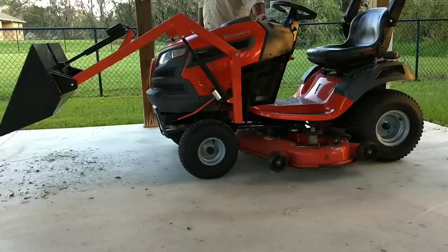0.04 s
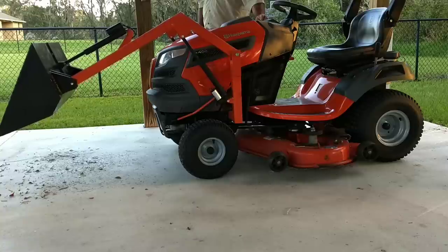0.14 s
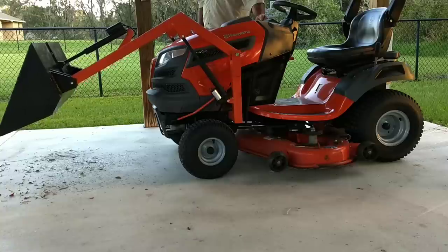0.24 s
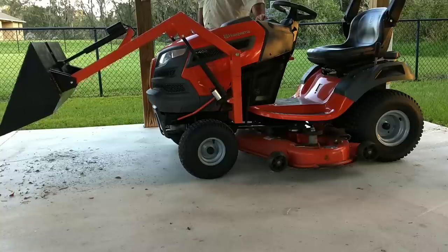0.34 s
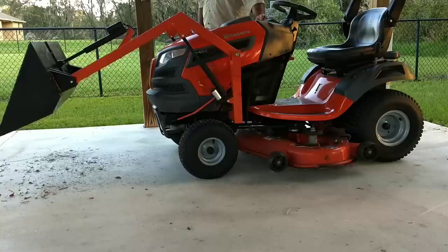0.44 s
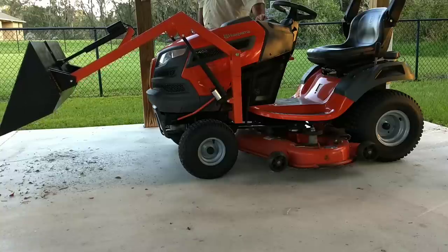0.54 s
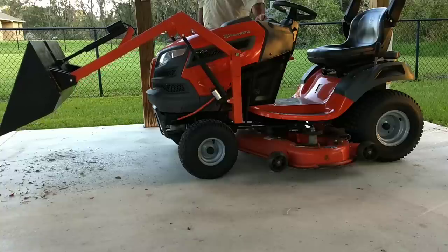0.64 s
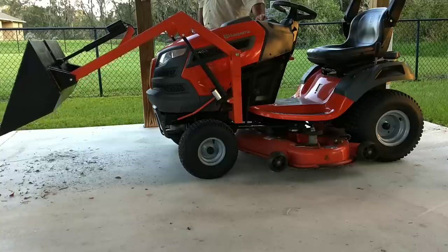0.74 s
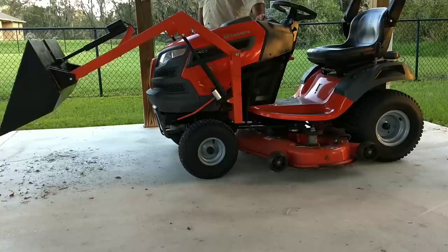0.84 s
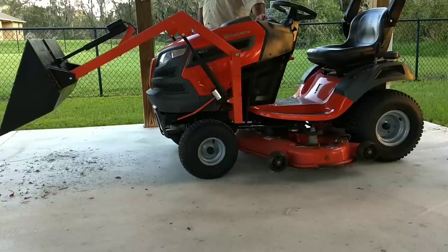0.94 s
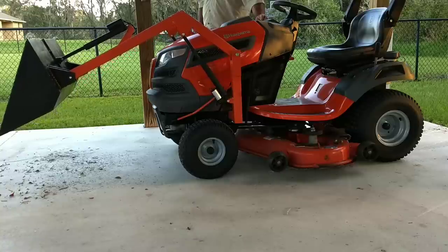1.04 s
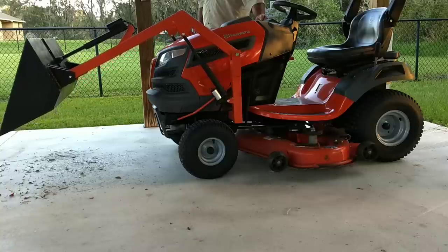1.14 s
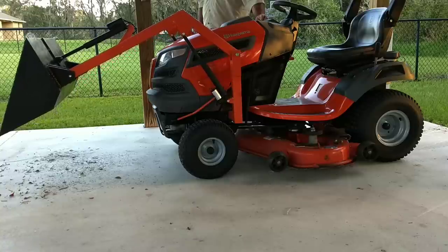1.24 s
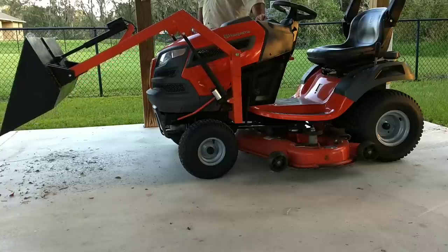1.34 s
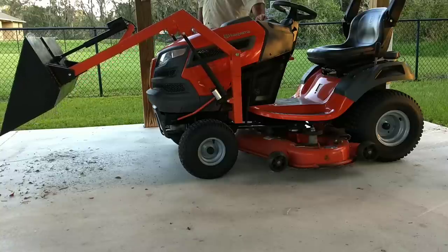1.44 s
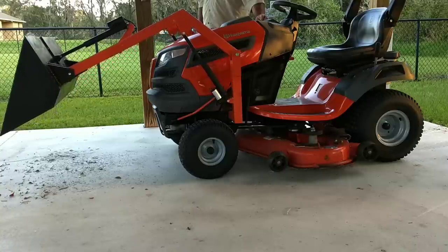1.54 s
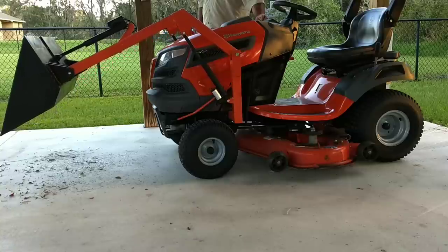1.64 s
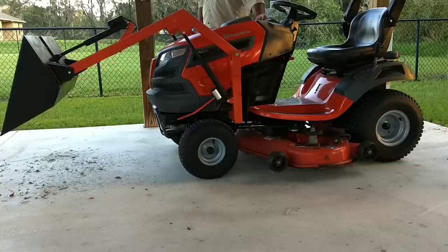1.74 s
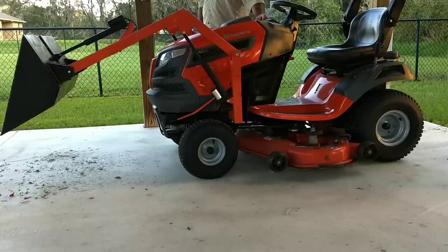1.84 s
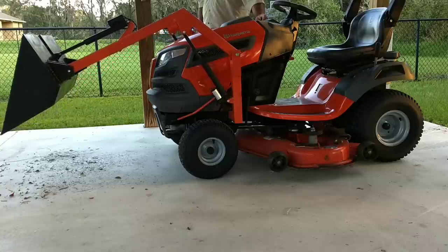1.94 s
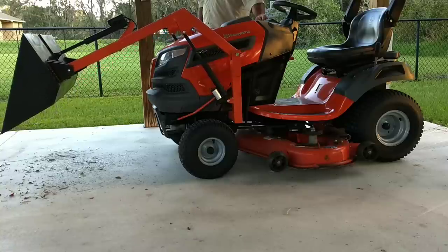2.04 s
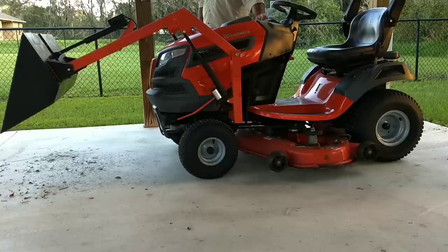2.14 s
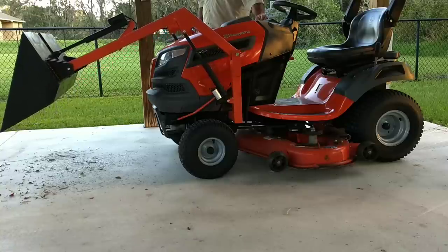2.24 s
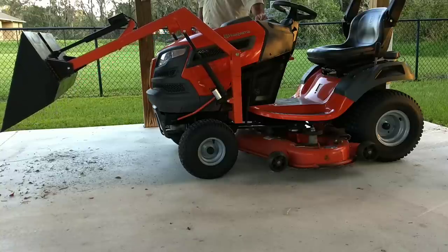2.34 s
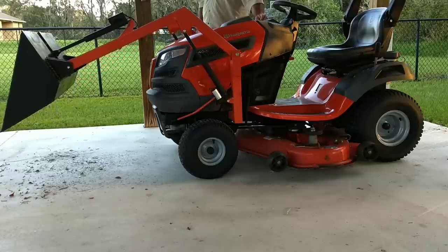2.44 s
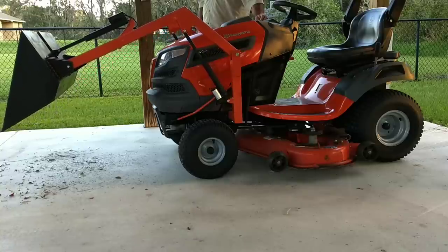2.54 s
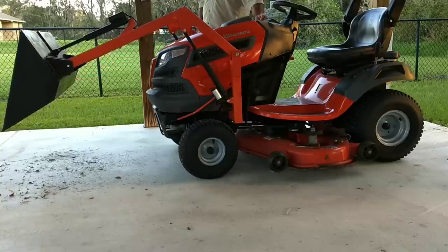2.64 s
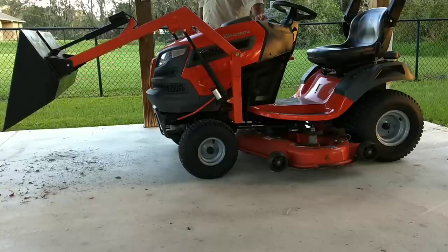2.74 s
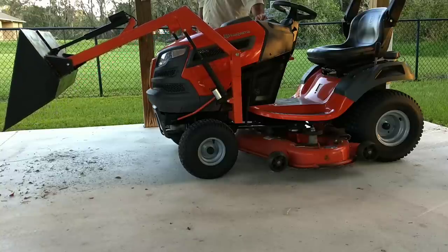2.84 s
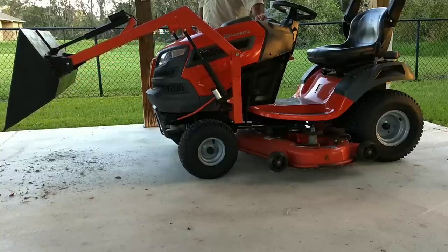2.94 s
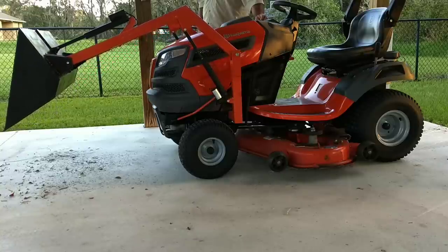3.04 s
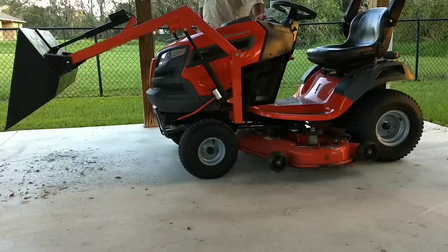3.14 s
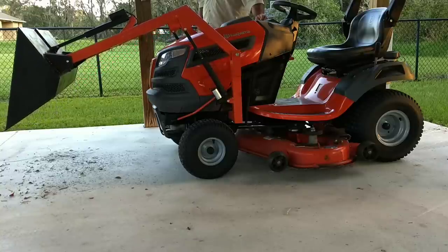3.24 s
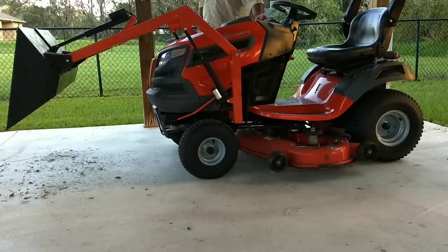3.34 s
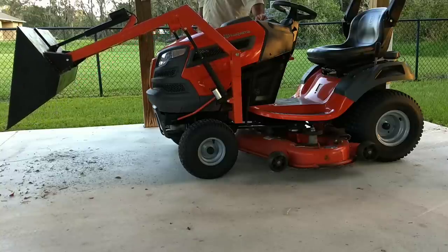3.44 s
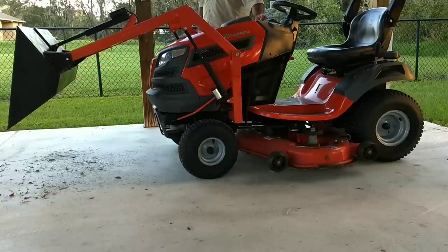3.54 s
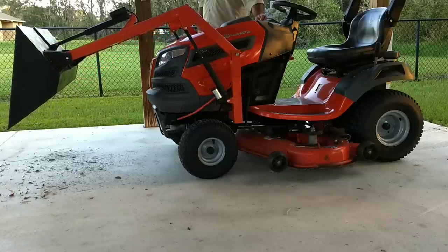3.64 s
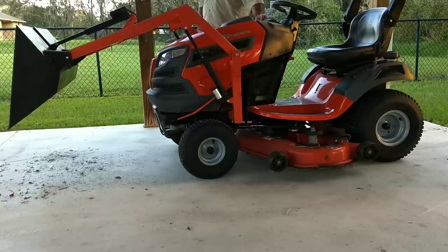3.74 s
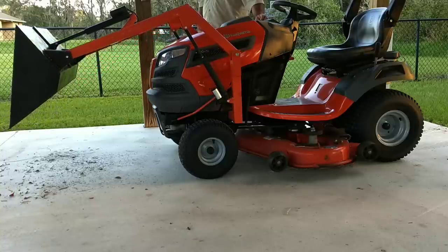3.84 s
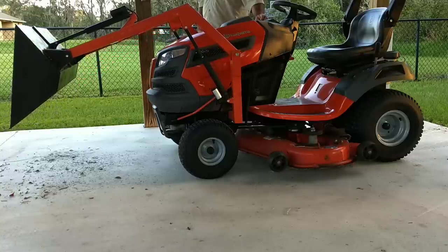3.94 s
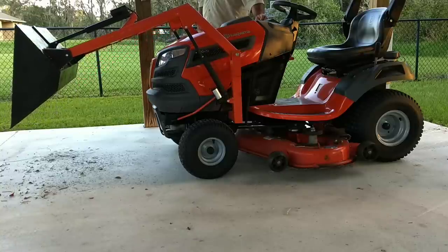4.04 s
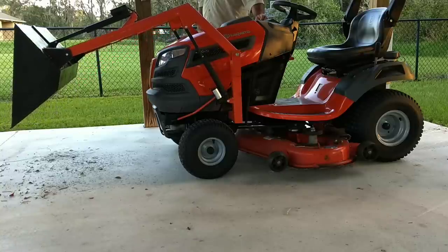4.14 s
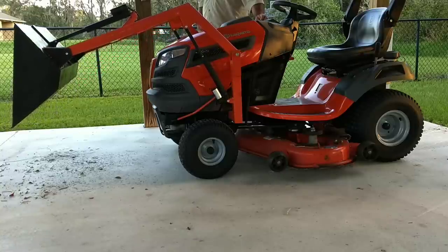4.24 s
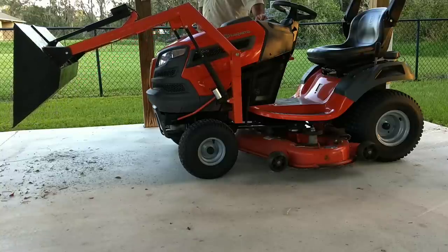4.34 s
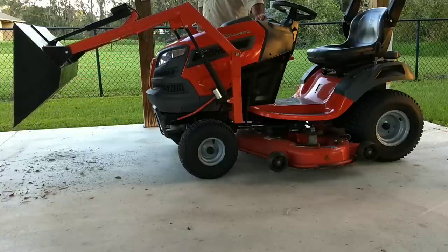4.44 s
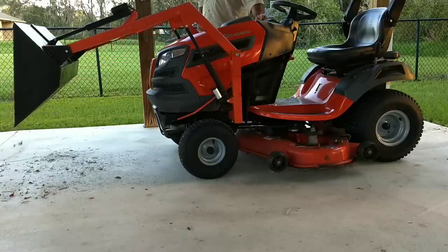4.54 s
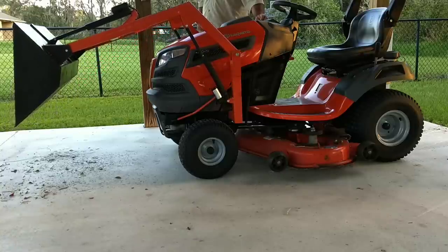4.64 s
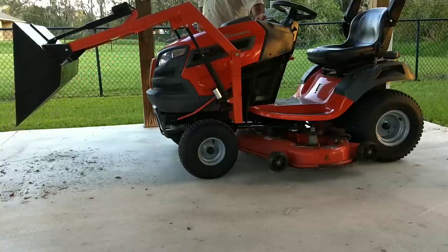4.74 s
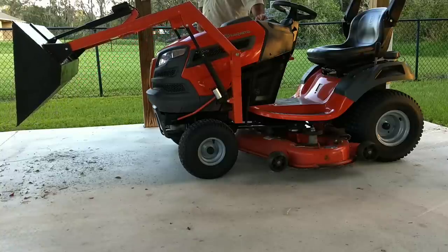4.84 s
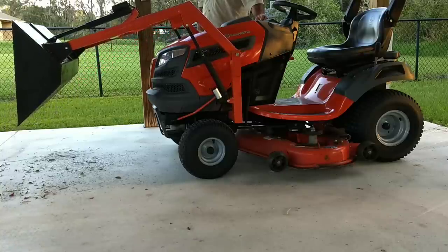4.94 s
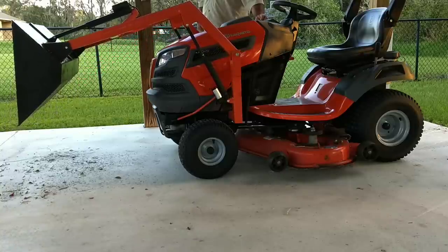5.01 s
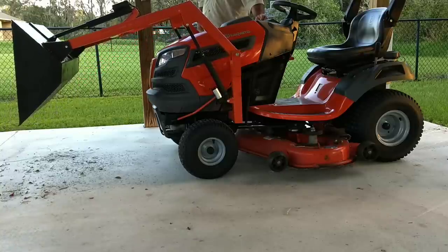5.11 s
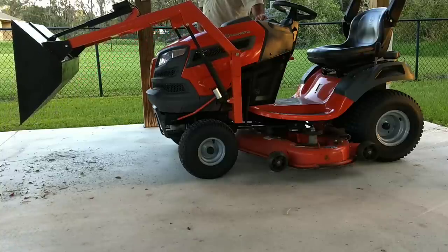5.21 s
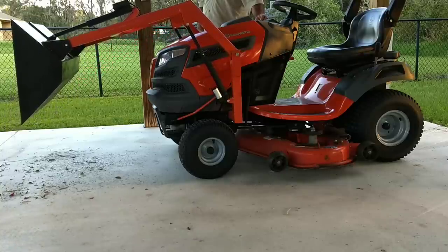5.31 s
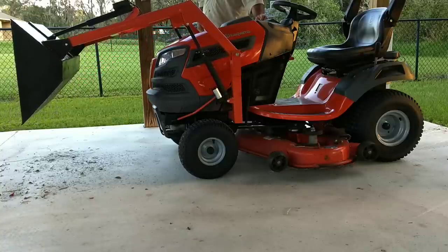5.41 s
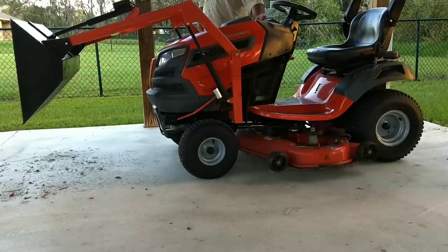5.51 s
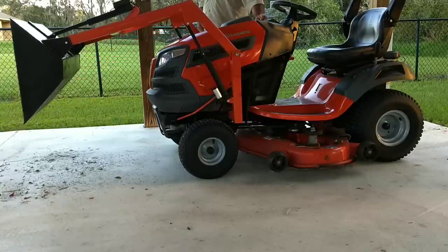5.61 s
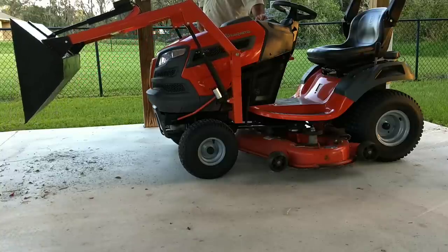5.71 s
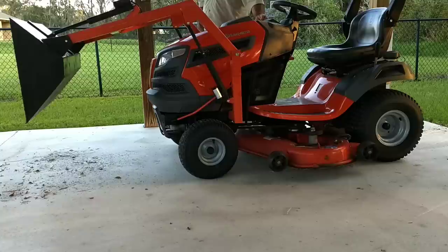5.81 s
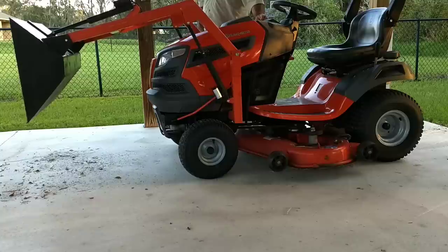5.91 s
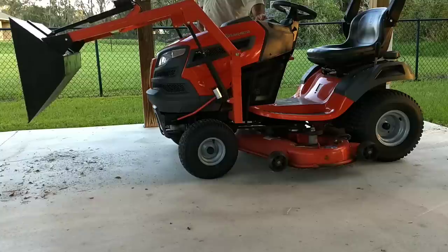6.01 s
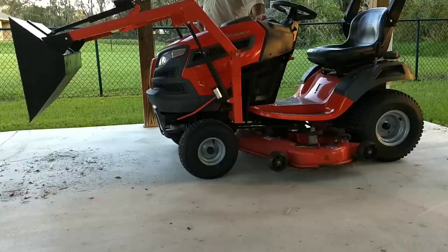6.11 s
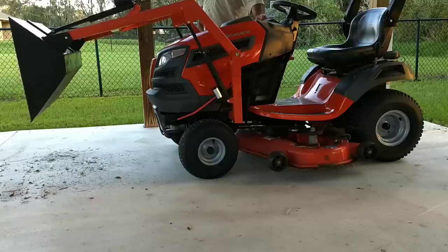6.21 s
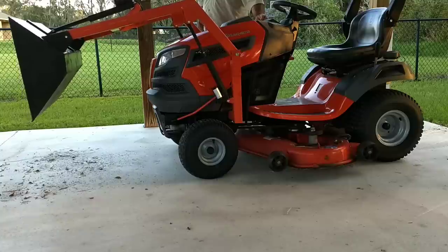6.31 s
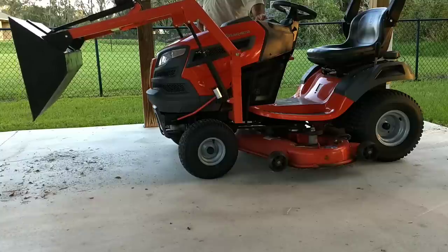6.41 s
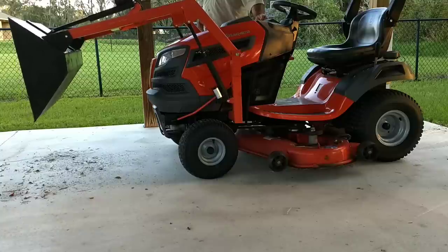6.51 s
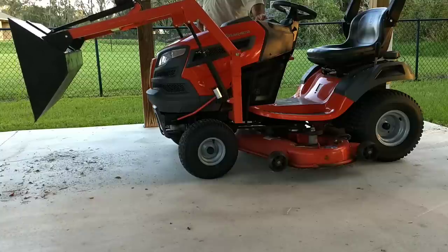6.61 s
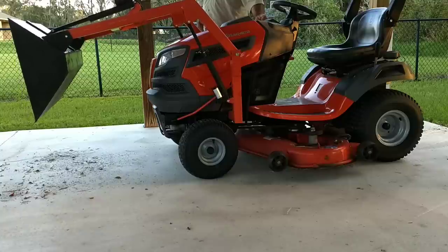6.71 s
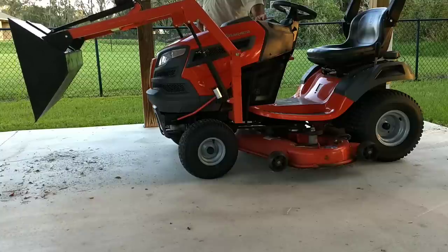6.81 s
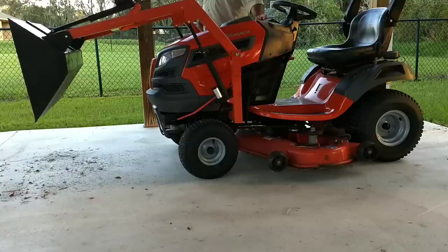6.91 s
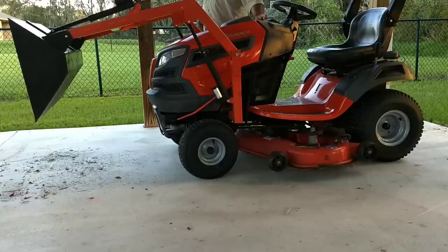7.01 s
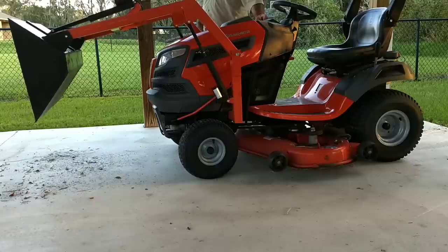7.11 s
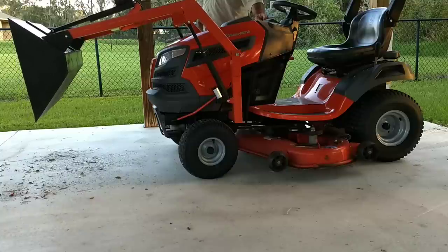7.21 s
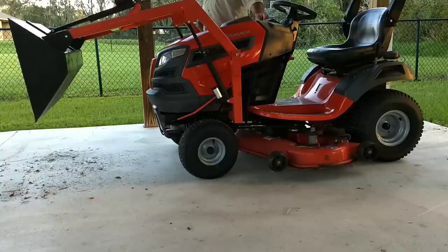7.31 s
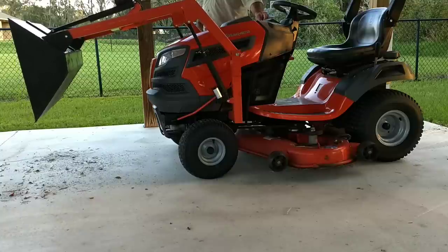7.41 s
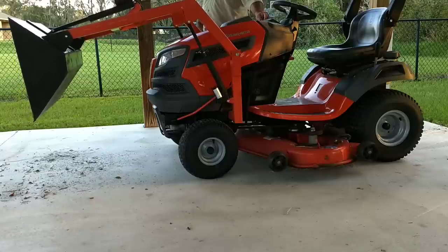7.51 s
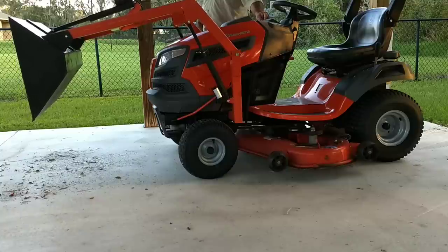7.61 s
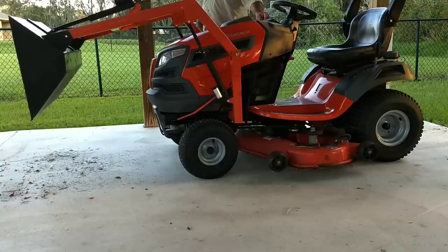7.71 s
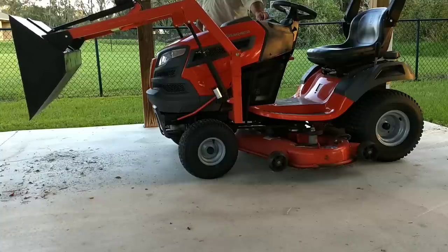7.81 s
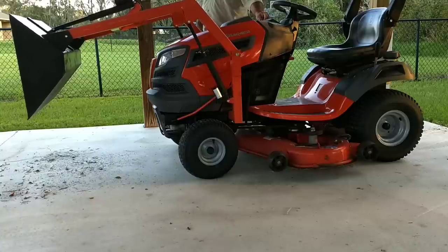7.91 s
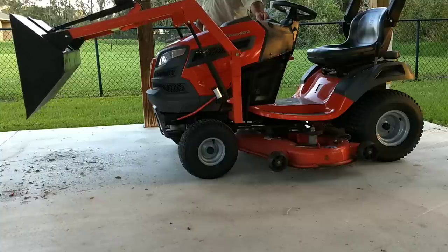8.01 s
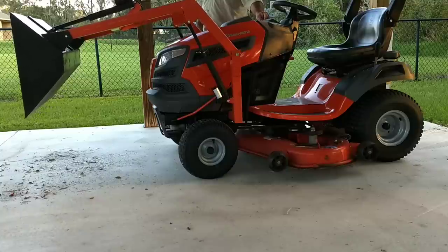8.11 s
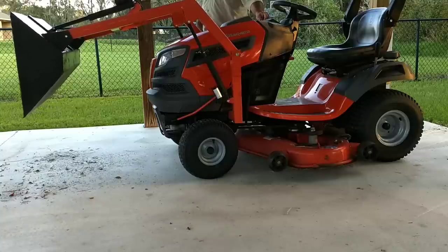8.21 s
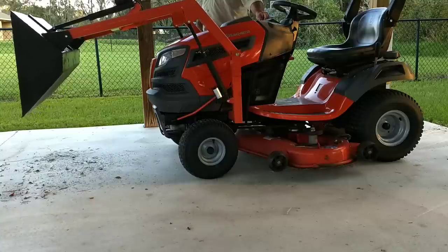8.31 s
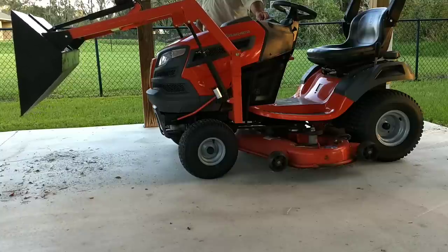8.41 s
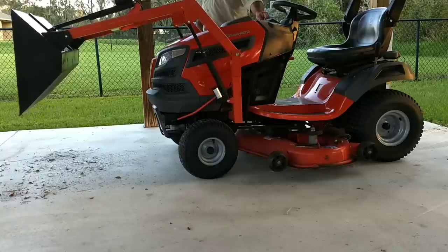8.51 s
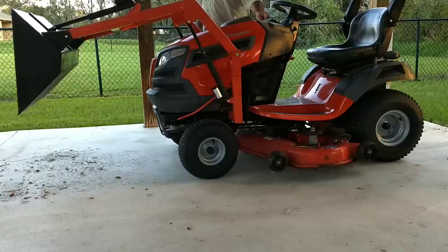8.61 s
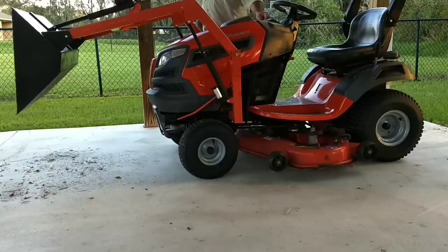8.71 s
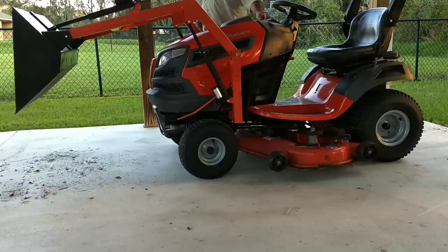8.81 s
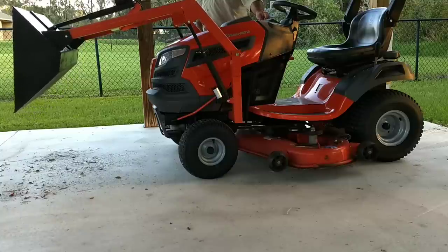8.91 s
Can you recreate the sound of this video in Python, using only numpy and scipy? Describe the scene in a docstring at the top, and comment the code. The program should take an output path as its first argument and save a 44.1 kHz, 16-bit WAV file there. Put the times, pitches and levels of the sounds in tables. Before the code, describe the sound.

Electric actuators raise the bucket of a small tractor with a steady, fluttering whine of gears and a hiss of brushes, the pitch swaying gently under load. They stop, leaving a brief lingering hum, a few soft knocks and a switch click. Then a faster pair of motors whirs up and keeps running. A low rumble lies behind, heard in stereo from close by under an open shelter with a concrete floor.

```python
"""Under an open shelter, roof above and concrete below, a stereo microphone stands by a small tractor.
Two electric screw actuators lift its bucket and stop; then a faster pair tips it. Commutators and
gears whine, brushes hiss, and the load slows the lifting motors once per turn of the screw.
In the pause the motors' tone and low hum linger, soft handling knocks tick and a switch clicks.
Behind it lies a low rumble, louder from the pause on as the recorder's gain rises."""
import sys
import numpy as np
from scipy import signal
from scipy.fft import rfft, irfft
from scipy.io import wavfile
from scipy.ndimage import uniform_filter1d

SR = 44100
rng = np.random.default_rng(int(sys.argv[2]) if len(sys.argv) > 2 else 0)


def persist_wave(psi):
    """Save psi, clipped to +-1, as 16-bit WAV."""
    counts = np.round(np.clip(psi, -1, 1) * 32767).astype(np.int16)
    wavfile.write(sys.argv[1], SR, np.atleast_2d(counts).T)


N = 394694
T = np.arange(N) / SR
FREQS = np.arange(N // 2 + 1) * SR / N
STOP_S = 6.52  # the bucket reaches the top
# resonances and notches of housings and arms: f/Hz, width/Hz, gain/dB
HOUSING = [(457, 187, 9), (600, 62, -2.5), (985, 250, 7), (1333.5, 15, 12), (1465, 48, 2.5),
           (1500, 100, 1.5), (1720, 93, 2), (2400, 210, 4.5), (2570, 140, -4), (3080, 65, 4),
           (3250, 390, -4.5), (3770, 780, 6), (4640, 340, 8), (5035, 230, 4.5), (5300, 260, -3.5),
           (5840, 410, 1.5), (11920, 720, -6)]


def undb(db):
    """Decibels to gain."""
    return 10 ** (np.asarray(db) / 20)


def unit(x):
    """Scale to rms 1."""
    return x / np.sqrt(np.mean(x ** 2))


def curve(rows):
    """The columns of a table, joined by straight lines in time."""
    times, *columns = np.transpose(rows)
    return np.squeeze([np.interp(T, times, column) for column in columns])


def ramp(start_s, length_s):
    """A straight rise from 0 to 1."""
    return np.clip((T - start_s) / length_s, 0, 1)


def fade(t60):
    """A decay from time zero, 60 dB down after t60 seconds."""
    return np.exp(-np.log(1000) * T / t60)


def colour(points, modes=()):
    """Gain at each frequency: a smooth slope with resonant humps and notches."""
    hz, db = np.transpose(points)
    gain = undb(np.interp(np.log(FREQS + 1), np.log(hz), db))
    for centre, width, peak_db in modes:
        gain = gain * undb(peak_db / (1 + (2 * (FREQS - centre) / width) ** 2))
    return gain


def shape(x, gain):
    """Filter by a gain at each frequency."""
    return irfft(rfft(x) * gain, N)


def coloured_noise(points):
    """Two channels of noise with the given spectrum, at rms 1."""
    return unit(shape(rng.standard_normal((2, N)), colour(points)))


def wander(hz, step=32):
    """A smooth random drift of rms 1, moving up to about hz times a second."""
    times = T[::step]
    rates = np.arange(len(times) // 2 + 1) / T[-1]
    slow = irfft(rfft(rng.standard_normal(len(times))) / (1 + (rates / hz) ** 2), len(times))
    return np.interp(T, times, unit(slow))


def tremble(hz):
    """An irregular flutter of rms 1, about hz times a second."""
    return unit(shape(rng.standard_normal(N), FREQS / hz / (1 + (FREQS / hz) ** 4)))


def ring(x, response):
    """Pass a sound through the first two seconds of an impulse response."""
    return signal.fftconvolve(np.atleast_2d(x), np.atleast_2d(response)[:, :2 * SR], axes=1)[:, :N]


def impulses(rows):
    """One sharp blow for each row of time and level."""
    blows = np.zeros(N)
    for start_s, db in rows:
        blows[int(start_s * SR)] += undb(db)
    return blows


def background():
    """A low background rumble, louder from the pause on as the recorder's gain rises."""
    # spectrum of the rumble: f/Hz, relative level/dB
    spectrum = [(20, -40), (50, -18), (80, -3), (170, 2), (350, -8), (700, -10), (1500, -18.5), (3000, -24),
                (6000, -35), (15000, -29.5)]
    # its level as the gain rises: t/s, level/dB
    level = [(0, -49), (6.2, -48.5), (6.9, -45), (7.5, -45), (8.95, -43.5)]
    return coloured_noise(spectrum) * undb(curve(level) + 1.3 * wander(11))


def shelter(x, wet_db=-13, low_t60=0.9, high_t60=0.68, split_hz=1800):
    """Roof and concrete slab throw the sound back to the microphone; the treble dies first."""
    noise = rng.standard_normal((2, N))
    low = shape(noise, 1 / (1 + (FREQS / split_hz) ** 4))
    response = (low * fade(low_t60) + (noise - low) * fade(high_t60)) * (T > .008)
    return undb(wet_db) * ring(x, response / np.sqrt(np.sum(fade(low_t60) ** 2)))


def lingering_tones(motors):
    """The motors' tone and low hum reverberate under the roof and linger after the lift stops."""
    # reverberating tones: f/Hz, t60/s, gain while driven/dB, level of the tail/dB
    modes = [(261, 1.0, -24, -36), (538, 1, 1, -37.5), (930, 0.94, -21, -32.5)]
    response = tail = 0
    for hz, t60, driven_db, tail_db in modes:
        mode = fade(t60) * np.sin(2 * np.pi * hz * T)
        response = response + undb(driven_db) * 2 * np.log(1000) / (t60 * SR) * mode
        tail = tail + undb(tail_db) * mode * (1 - fade(0.085))
    return ring(motors, response) + np.pad(tail, (int(STOP_S * SR), 0))[:N]


def ticks():
    """Short, dry ticks on top of the soft handling knocks."""
    # treble edges of the knocks: t/s, level/dB
    edges = [(6.744, -43.5), (6.765, -54), (7.08, -57), (7.277, -61)]
    # spectrum of a tick: f/Hz, relative level/dB
    spectrum = [(300, -20), (1200, 0), (3000, -2), (5500, -6), (9000, -12), (15000, -11)]
    return ring(impulses(edges), coloured_noise(spectrum) * fade(0.086))


def switch(start_s=7.172):
    """A short click that rings the switch's plastic case."""
    # modes of the case: f/Hz, t60/s, level/dB
    modes = [(1240, .09, -41), (1310, .08, -41), (2120, .08, -37), (3100, .05, -50)]
    case = sum(undb(db) * fade(t60) * np.sin(2 * np.pi * hz * T) for hz, t60, db in modes)
    click = case + undb(-48) * fade(0.089) * rng.standard_normal((2, N))
    return np.pad(click, ((0, 0), (int(start_s * SR), 0)))[:, :N]


def knocks():
    """Dull, dead handling knocks in the pause, each with a brief rattle."""
    # soft blows: t/s, relative level/dB
    hits = [(6.557, -35), (6.75, -31), (6.802, -30), (6.822, -30), (7.008, -35), (7.079, -33), (7.095, -30),
            (7.278, -32), (7.309, -33), (7.372, -32.5), (7.411, -37)]
    # spectrum of the thud: f/Hz, relative level/dB
    spectrum = [(40, -23), (130, -4), (300, -4.5), (600, -7.5), (1000, -18), (3000, -28), (8000, -46),
                (15000, -34)]
    blows = impulses(hits)
    # minimum phase packs the thud's energy at its start
    cepstrum = irfft(np.log(colour(spectrum)), N)
    thud = irfft(np.exp(rfft(2 * cepstrum * (T < T[-1] / 2))), N)
    rattle = rng.standard_normal((2, N)) * fade(0.1) * undb(-24)
    return undb(1.5) * ring(blows + ring(blows, rattle), thud / np.abs(thud).max())


def coast(start_s=6.42, attack_s=0.037, level_db=-25):
    """With the current off the gears grind briefly to rest."""
    # spectrum of the grinding: f/Hz, relative level/dB
    spectrum = [(60, -28), (260, -6), (520, -6), (700, -3), (1000, 3), (1600, -9), (2600, -14), (5000, -32),
                (15000, -54)]
    grind = coloured_noise(spectrum)
    dying = np.pad(fade(t60=0.62), (int(start_s * SR), 0))[:N]
    return grind * ramp(start_s, attack_s) * dying * undb(level_db + 1.1 * wander(35))


def shaft(hz, jitter):
    """Turns made by a motor whose speed trembles a little."""
    return np.cumsum(hz * (1 + jitter * wander(13.77))) / SR


def partial(turns, order, rough, chatter_hz):
    """A clean line at order times the shaft rate, plus a skirt from teeth that strike unevenly."""
    rough = np.clip(rough, 0, .98)
    angle = 2 * np.pi * order * turns
    skirt = wander(chatter_hz) * np.cos(angle) + wander(chatter_hz) * np.sin(angle)
    line = np.sqrt(2 * (1 - rough ** 2)) * np.sin(angle + rng.uniform(0, 2 * np.pi))
    return line + rough * skirt


def brushes(turns, spectrum, bars, bar_depth, turn_depth, grit_db, spread, spots=560):
    """Brushes scrape the commutator bars; part of the scrape comes round again on every turn."""
    wear = np.interp(turns % 1 * spots, np.arange(spots), rng.standard_normal(spots))
    pressure = 1 + bar_depth * np.cos(2 * np.pi * bars * turns)
    pressure *= 1 + turn_depth * np.cos(2 * np.pi * turns)
    pressure *= undb(grit_db * tremble(31))
    scrape = rng.standard_normal(N) + wear
    width = spread / (1 + (FREQS / 8000) ** 2)  # the channels are more alike in the treble
    scattered = shape(rng.standard_normal((2, N)), width)
    radiated = colour(spectrum, HOUSING) / np.sqrt(1 + width ** 2)
    return unit(shape((scrape + scattered) * pressure, radiated))


def tilt(start_s=7.435, attack_s=0.063, bars=10):
    """Two smaller motors tip the bucket: they labour, speed up as the load eases, and beat."""
    # shaft speeds: t/s, fast motor/Hz, slow motor/Hz
    speeds = [(7.45, 90.6, 83.5), (7.5, 91.6, 85.5), (7.55, 91.5, 86.5), (7.65, 91, 87.6),
              (7.715, 90.2, 86.5), (7.75, 90.3, 93.3), (7.8, 98, 94.3), (8.0, 97.5, 95.3),
              (8.25, 97.7, 95.5), (8.42, 97.6, 96.2), (8.6, 97.6, 96.2), (8.75, 97.6, 96.8),
              (8.95, 97.4, 96.4)]
    # starting load: t/s, share/0-1
    load = [(7.72, 1), (7.8, 0)]
    # the fast motor's commutator tone, loud while it labours: t/s, level/dB
    tone_level = [(7.45, -48), (7.5, -36), (7.55, -31.5), (7.62, -31), (7.7, -26.5), (7.76, -28),
                  (7.8, -42), (8.3, -43), (8.5, -43), (8.95, -36.5)]
    # partials of each motor: multiple of the shaft rate, level labouring/dB, level running free/dB
    fast_motor = [(3.01, -45, -65), (8, -47, -38), (9.14, -62, -40.5), (10.84, -61, -52), (11.98, -52, -44),
                  (15.04, -56, -52), (16, -46, -49.5), (18.2, -44, -50), (19, -39, -41),
                  (19.95, -40, -35.5), (22.6, -51, -67), (24.4, -55, -51), (30.06, -52, -43.5),
                  (36, -66, -52), (38.6, -46, -57), (39.24, -55, -45), (40.1, -46, -44), (47.3, -46, -54),
                  (48.4, -58, -56), (49.7, -49, -50), (57, -49, -57)]
    slow_motor = [(2.98, -52, -60), (5, -69, -53.5), (7.95, -42, -44.5), (10.01, -42, -42.5),
                  (12.05, -47, -49), (16.07, -40, -47), (20, -36.5, -30.5), (20.85, -43, -62),
                  (25.2, -52, -62), (30, -41, -43), (30.8, -53, -48), (39, -58, -56), (39.9, -46, -43.5),
                  (50, -40, -45.5), (51.3, -51, -49), (60.2, -43.5, -50)]
    # brush noise as the housings radiate it: f/Hz, relative level/dB
    brush_spectrum = [(60, -20), (240, 7.5), (330, -1), (620, -4.5), (850, 4), (1400, 5), (1650, 4),
                      (2500, 6), (3800, -1.5), (5600, 1.5), (6700, -5), (8800, -8), (12000, 6.5),
                      (14000, -0.5), (15500, 4)]
    labour, shaft_hz = curve(load), curve(speeds)
    shafts = [shaft(hz, jitter=0.000895) for hz in shaft_hz]
    whine = undb(curve(tone_level)) * partial(shafts[0], bars, rough=0.091, chatter_hz=25)
    hiss = 0
    for turns, hz, partials in zip(shafts, shaft_hz, (fast_motor, slow_motor)):
        # the partials sink into the noise while the speed changes
        surge_hz_per_s = uniform_filter1d(np.abs(np.gradient(hz, T)), size=1500)
        dip_db = -8 * surge_hz_per_s / (surge_hz_per_s + 60)
        for order, labour_db, free_db in partials:
            db = free_db + (labour_db - free_db) * labour + dip_db
            whine += undb(db) * partial(turns, order, rough=.27, chatter_hz=40)
        hiss += brushes(turns, brush_spectrum, bars,
                        bar_depth=0.32, turn_depth=0.12, grit_db=1.0, spread=0.85)
    hiss_db = -31.5 + 0.4 * (T - start_s) - 0.7 * labour
    return ramp(start_s, attack_s) * (whine + undb(hiss_db) * hiss)


def lift_gears(turns, bars, height, free):
    """Loaded gear teeth whine along with the commutator's overtones; the mix shifts with the load."""
    # gear partials: multiple of the shaft rate, relative level with the bucket low/dB and high/dB,
    # swell when the screw runs free/dB, roughness/0-1
    teeth = [(3.334, -19.5, -21.5, 0.5, 0.68), (6, -19, -12.5, -1.5, 0.78), (14.13, -21, -18, -2.5, 0.8),
             (17, -11, -15.5, 0, 0.54), (23.01, -9, -3, 1, 1), (25, -13, -12, 3.5, 0.97),
             (35.57, -18.5, -17, -9, 0.75), (37.07, -10, -9.5, 5, 0.86), (47.1, -5.5, -11.5, 0.5, 1),
             (49.13, -7, -13.5, 2.5, 0.83), (59.97, -7, -2, -2.5, 0.76), (61.5, -9, -19, 0, 0.74),
             (71.5, -25, -12.5, -1.5, 0.9)]
    # commutator overtones: harmonic number, then the same three columns in dB
    harmonics = [(2, -3.5, 2, -0.5), (3, -1, -16.5, 3), (4, -1, -2.5, -1)]
    overtones = [(bars * number, *levels, .22) for number, *levels in harmonics]
    whine = 0
    for order, low_db, high_db, swell_db, rough in overtones + teeth:
        db = low_db + (high_db - low_db) * height + swell_db * free + 2.85 * wander(20.0)
        whine += undb(db) * partial(turns, order, rough, chatter_hz=46.5)
    return whine


def lift_commutator(turns, bars, height):
    """Bars passing the brushes sing a fluttering tone that roughens as the bucket rises."""
    # the tone surges and sinks as the screw turns: t/s, level/dB
    surges = [(0.0, -29), (0.03, -22.5), (0.18, -22.5), (0.25, -32.5), (0.49, -18.5), (0.54, -31),
              (0.81, -22.5), (0.85, -31.5), (0.9, -20.5), (0.96, -35), (1.23, -18.5), (1.26, -24),
              (1.39, -20), (1.41, -35), (1.46, -18.5), (1.6, -25.5), (1.7, -16), (1.77, -35), (1.8, -22),
              (1.93, -21.5), (1.97, -15.5), (2.06, -22.5), (2.09, -33), (2.15, -19), (2.36, -17.5),
              (2.49, -25), (2.62, -22.5), (2.67, -29), (2.74, -15.5), (3.16, -27), (3.21, -14.5),
              (3.27, -32), (3.3, -18), (3.47, -33.5), (3.52, -17), (3.64, -19), (3.7, -31.5), (3.83, -32),
              (4.02, -18.5), (4.08, -30.5), (4.44, -21.5), (4.48, -29), (4.62, -38), (4.66, -27),
              (4.8, -18.5), (4.84, -39), (4.85, -30), (5.03, -32.5), (5.12, -19), (5.27, -31),
              (5.52, -20.5), (5.67, -30.5), (5.72, -22.5), (5.77, -28), (5.92, -19.5), (6.01, -29.5),
              (6.28, -26.5), (6.37, -32), (6.44, -23.5), (6.48, -31.5)]
    # side tones: multiple of the shaft rate, level with the bucket low/dB and high/dB
    side_tones = [(11, -48, -37), (13, -40, -30.5)]
    tone = partial(turns, bars, rough=.1 + .17 * height, chatter_hz=35.0)
    sides = 0
    for order, low_db, high_db in side_tones:
        db = low_db + (high_db - low_db) * height
        sides += undb(db) * partial(turns, order, rough=.72, chatter_hz=29.3)
    surge_db = curve(surges)
    tone *= undb(surge_db + 0.08)
    sides *= undb(.8 * (surge_db - surge_db.mean()))  # they follow most of each surge
    return (tone + sides) * (1 + .2 * np.tanh(tremble(30)))


def lift(bars=12, start_hz=80.31, sag_hz_per_s=.58, gear_ratio=30.7, first_free_s=0.089, cut_s=6.44):
    """The lifting motors slow under load; pitch and level rise once a turn as the screw runs free."""
    # brush noise as the housings radiate it: f/Hz, relative level/dB
    brush_spectrum = [(40, -37), (250, -17), (650, -8), (850, 6), (1350, 1.5), (1600, 0), (2500, 1),
                      (3800, -1.5), (5400, -2), (6700, -9), (8800, -6), (12500, 6), (14000, -2.5),
                      (15500, -3)]
    # slow drift of the hiss: t/s, relative level/dB
    hiss_level = [(0, -31.5), (1.05, -32.5), (1.25, -30.5), (3.0, -31.5), (3.9, -31), (4.8, -30.5),
                  (5.0, -32), (5.6, -31), (6.4, -31)]
    mean_hz = start_hz - sag_hz_per_s * T
    screw_turns = (np.cumsum(mean_hz) / SR - start_hz * first_free_s) / gear_ratio
    free = np.cos(2 * np.pi * screw_turns)  # 1 running free, -1 under full load
    height = ramp(0, STOP_S)
    current = 1 - ramp(cut_s, 0.13)
    sway_hz = 0.847 - 0.197 * height
    turns = shaft(mean_hz + sway_hz * free, jitter=0.001082)
    tone = lift_commutator(turns, bars, height)
    gears = undb(-3.0) * lift_gears(turns, bars, height, free)
    hiss = brushes(turns, brush_spectrum, bars,
                   bar_depth=0.15, turn_depth=0.068, grit_db=0.72, spread=1.5)
    hiss_db = curve(hiss_level)
    hiss *= undb(3.5 + hiss_db - hiss_db.mean())
    gears_and_hiss = (gears + hiss) * undb(-28 + 0.8 * free) * current
    return current * (tone + gears_and_hiss)


def scene():
    """The tractor under its shelter, with a low rumble behind."""
    motors = lift() + coast() + tilt()
    near = motors + lingering_tones(motors) + knocks() + ticks() + switch()
    return near + shelter(near) + background()


def record(dry):
    """The stereo microphone trades mid for side in a regular ripple up the spectrum, and cuts the top."""
    # side against mid: f/Hz, gain/dB
    side_tilt = [(60, 0), (150, 2), (500, 1), (950, -7.5), (1800, -4), (3000, -3), (8000, -0.5)]
    # right port against left: f/Hz, gain/dB
    right_port = [(900, -0.2), (2000, 0.5), (6000, 1), (9000, 2.5), (13000, 3.5), (15500, 2)]
    ripple_hz, top_hz = 2200, 15600
    bass_angle = np.minimum(.5 + FREQS / 550, 1.2)  # keeps some bass in the mid channel
    angle = np.maximum(np.pi * FREQS / ripple_hz, bass_angle)
    mid = shape(dry[0], np.sin(angle))
    side = shape(dry[1], 1j * np.cos(angle) * colour(side_tilt))
    lean = np.sqrt(colour(right_port))
    ports = np.array([shape(mid + side, 1 / lean), shape(mid - side, lean)])
    return signal.sosfilt(signal.ellip(10, .2, 80, top_hz, fs=SR, output="sos"), ports)


dry = scene()
out = record(dry)
persist_wave(out)
```